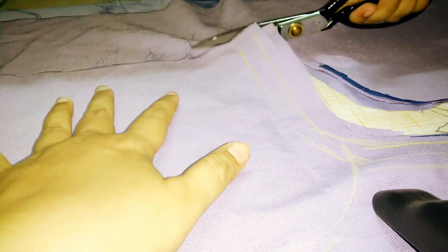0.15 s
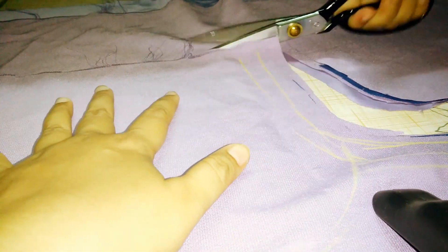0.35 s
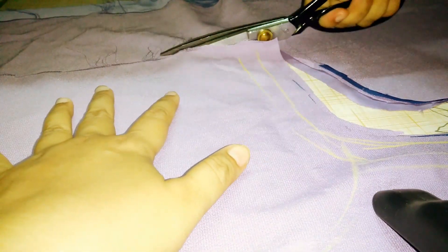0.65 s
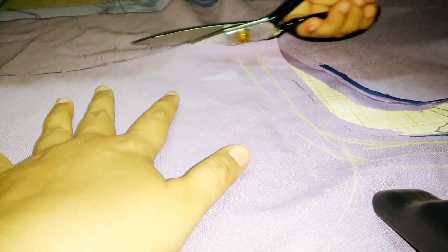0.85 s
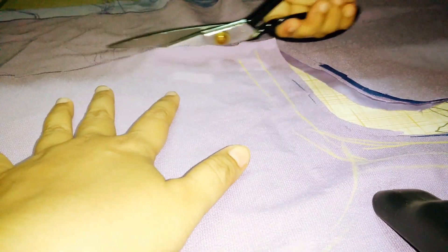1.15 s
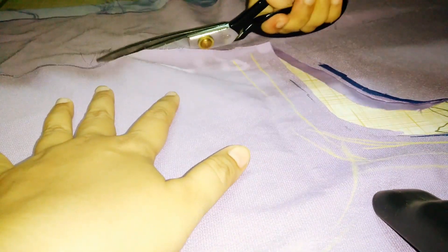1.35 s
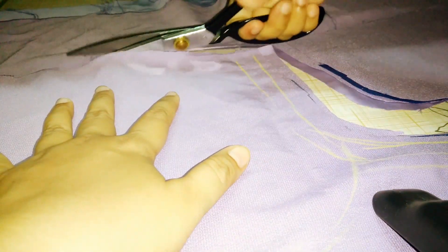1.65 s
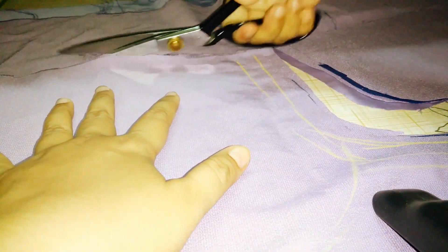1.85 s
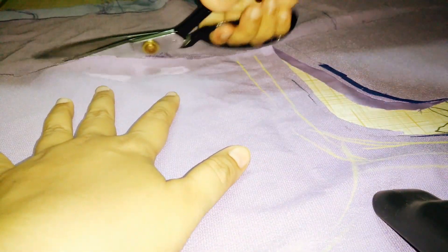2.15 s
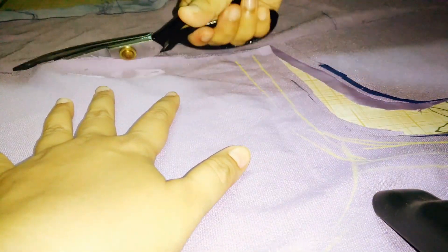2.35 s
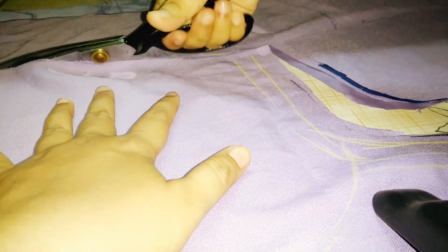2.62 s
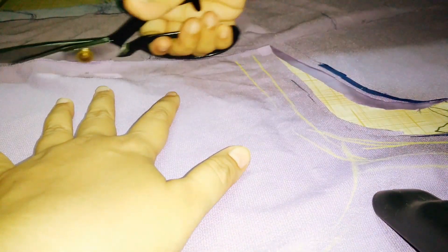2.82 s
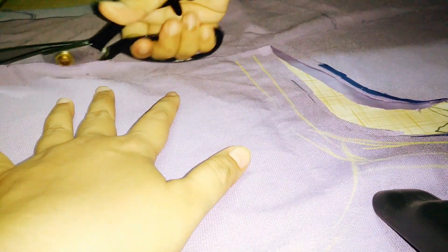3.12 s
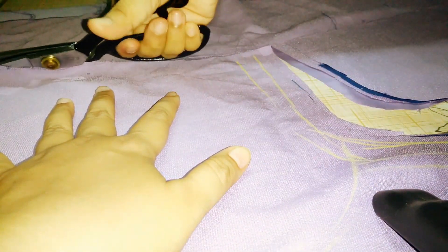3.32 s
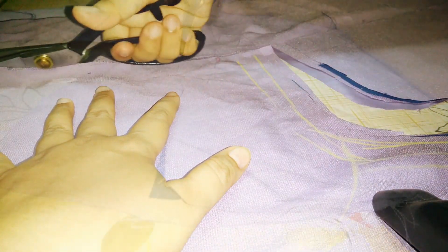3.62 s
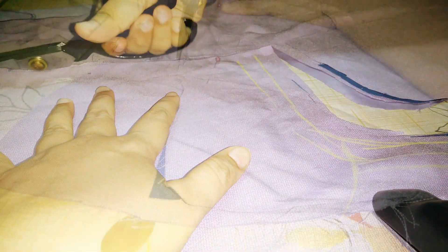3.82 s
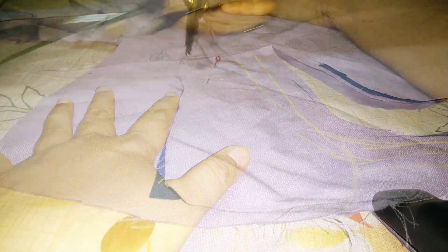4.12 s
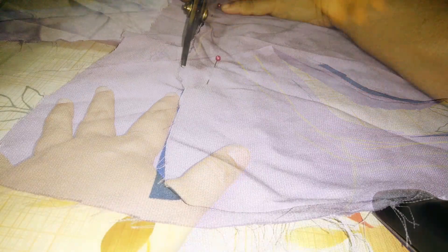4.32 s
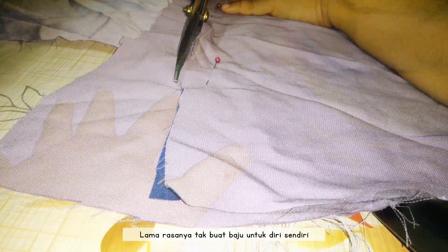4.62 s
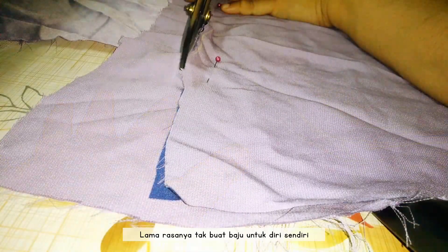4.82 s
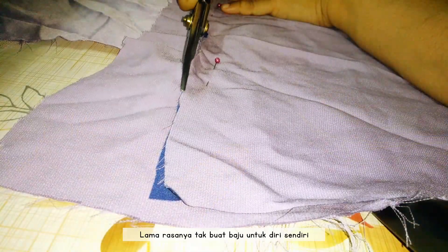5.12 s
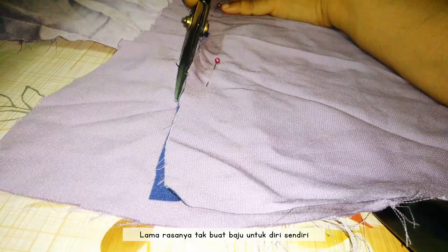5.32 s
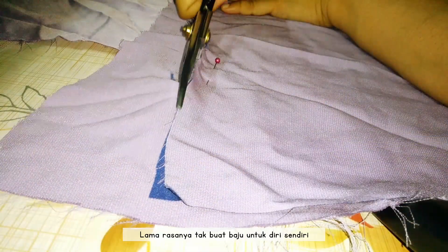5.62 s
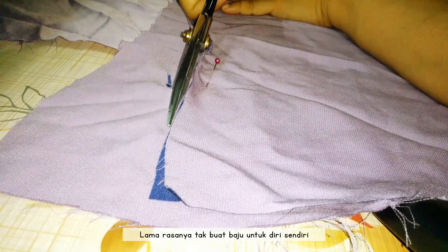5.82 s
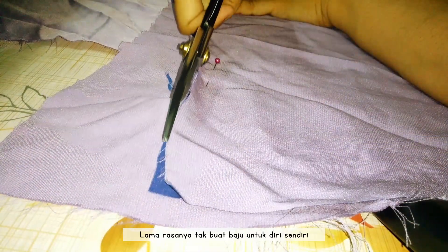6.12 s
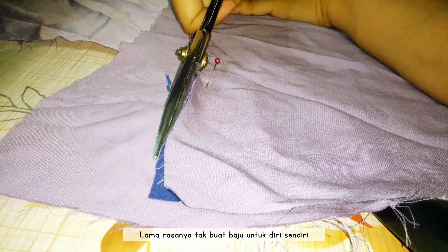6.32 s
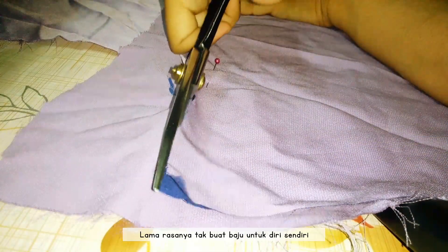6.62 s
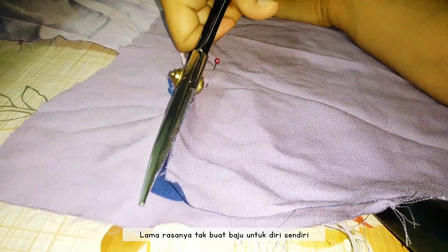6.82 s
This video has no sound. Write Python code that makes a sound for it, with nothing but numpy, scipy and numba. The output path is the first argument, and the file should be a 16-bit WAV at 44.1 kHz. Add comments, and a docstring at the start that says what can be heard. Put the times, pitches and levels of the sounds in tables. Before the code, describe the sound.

Close, dry sound of large steel shears cutting cloth spread on a board in a quiet furnished room. From 0 to 3.6 s quick snips come roughly every 0.35 s, each a tenth of a second of gritty crackle as threads part, with a woody low body and bright steel ring; shorter scrapes of the opening blades fall between them. Light steel taps on the board are scattered throughout, and cloth rustles softly. Around 3.4 to 3.9 s small nudges patter, then a hard, dull knock lands at 4.0 s with another snip. From 4.6 s the cutting slows to strokes at about 4.6, 5.3, 5.9, 6.4 and 6.9 s, mostly longer, pressing harder toward their ends, with distinct opening scrapes between; a firmer knock comes near 6.5 s. Faint room air and hiss remain beneath, the top end dulled by a small microphone.

```python
"""Large steel shears cut cloth spread on a board, close to a small microphone in a quiet room, for 7 s.
From the start quick snips crackle as threads part, and the opening blades scrape; cloth rustles throughout.
Steel knocks on the board are scattered through the work, the hardest at 4 s, after a few small nudges.
From 3.5 to 4.9 s the balance of the resonances shifts; from 4.6 s slow cuts bear down near the tips.
Crackle and grit ring board, handles and blades as resonators; knocks are short pushes, cloth is shaped noise."""
import sys
import numpy as np
from scipy import signal
from scipy.fft import rfft, irfft
from scipy.io import wavfile
from scipy.ndimage import uniform_filter1d
from numba import njit

SR = 44100
rng = np.random.default_rng(int(sys.argv[2]) if len(sys.argv) > 2 else 0)


def digitize_waveform(pressure):
    """Quantize a signal to 16-bit integers and store it at the path in sys.argv[1].

    Rows of a 2-D input are taken as channels; values are limited to [-1, 1].
    """
    field = np.atleast_2d(pressure).T
    bounded = np.clip(field, -1, 1)
    quanta = np.round(bounded * 32767).astype(np.int16)
    wavfile.write(sys.argv[1], SR, quanta)


def nominal_scale(level):
    """Amplitude ratio for a level in decibels (scalar or array-like)."""
    x = np.asarray(level, float) / 20
    return 10 ** x


N = 306495
T = np.arange(N) / SR

# quick snips: start_s, length_s, board_db, blades_re_board_db, attack_s
SNIPS = [(0.326, 0.16, -45, -2.5, 0.011), (0.775, 0.1, -42, -2, 0.024), (1.124, 0.11, -41.5, -2, 0.02),
         (1.486, 0.11, -42, -1.5, 0.019), (1.851, 0.11, -42.5, 1.5, 0.013), (2.175, 0.11, -43, 1, .012),
         (2.478, 0.092, -41, 2, 0.011), (2.762, 0.12, -44.5, 4, 0.012), (3.117, 0.11, -45, 4, 0.017),
         (3.468, 0.17, -46.5, 2, 0.029), (3.953, 0.1, -39, -1.5, 0.024)]
# slow cuts: start_s, length_s, board_db, blades_re_board_db, final_push_db, push_at_share_of_stroke
CUTS = [(4.592, 0.26, -47, 0.5, 4, 0.86), (5.268, 0.25, -45, 0.5, 9.5, 0.83),
        (5.891, 0.16, -47, 1.5, 8, 0.79), (6.369, 0.18, -49.5, 6, 10, 0.83),
        (6.863, 0.21, -48.5, -0.5, 5, .85)]
# blades opening: start_s, length_s, board_db, blades_re_board_db, sag_db
OPENINGS = [(-0.012, 0.059, -43, 1, 6), (0.519, 0.064, -47, 2, 2.5), (0.93, 0.059, -48.5, 0, 0.5),
            (1.279, 0.059, -49, -3.5, 4.5), (1.666, 0.059, -50, -3, 1), (2.014, 0.062, -49, 1, 8.5),
            (2.334, 0.061, -49, 4, 6), (2.631, 0.049, -48.5, 2, 3), (2.929, 0.06, -48.5, 2, 11),
            (3.288, 0.043, -47, 2.5, 8.5), (3.692, 0.071, -49, 3.5, 1.5), (4.156, 0.057, -44.5, 2, -0.5),
            (4.924, 0.046, -45.5, -2.5, 1), (5.595, 0.051, -39.5, -4.5, 7.5), (6.103, 0.07, -46, -2.5, 5),
            (6.612, 0.049, -42, -4.5, 17)]
# nudges of the half-open shears: start_s, length_s, board_db, blades_re_board_db
NUDGES = [(3.442, 0.013, -50, -8), (3.656, 0.02, -50, -1), (3.784, 0.016, -49, 2.5),
          (3.808, 0.024, -49.5, 2), (3.848, 0.023, -51.5, 7), (3.886, 0.01, -51, 0),
          (3.907, 0.0096, -50, 2.5), (3.93, 0.021, -58, 4), (4.063, 0.024, -52.5, 1.5),
          (4.52, 0.045, -62.5, -4), (4.568, 0.011, -50.5, -1), (5.19, 0.024, -46.5, -10.5),
          (5.848, 0.036, -47.5, -11.5), (6.35, 0.015, -48, -7)]
# course of each kind of stroke, added to its levels:
# share_of_stroke, board_db, handles_db, flex_db, edge_db, flex_ring_hz, edge_ring_hz (before COLOUR ratios)
SNIP_COURSE = [(0, -3, -2, -1.5, -2.5, 3800, 6850), (.12, -5, -0.5, 2, 0, 3680, 6750),
               (.4, 0.5, -2, -2, -1, 3570, 6400), (.8, -2.5, 0.5, 0.5, 3, 3220, 6200),
               (1, -5, -1.5, 5, 2.5, 3210, 6300)]
CUT_COURSE = [(0, 0.33, 0.41, 1, -5, 3680, 6420), (.3, -1.1, 0.59, 1.6, -2.5, 3650, 6500),
              (.65, 0, 0, 0, 0.5, 3500, 6500), (1, -1.75, 0, -1, 1.5, 3230, 6280)]
OPENING_COURSE = [(0, 0.17, -4, -7, -9, 3950, 5900), (.35, -3.65, 2.5, 3, 0.5, 4000, 6020),
                  (1, -0.72, -0.5, -0.5, -7.5, 3750, 6640)]
NUDGE_COURSE = [(0, -1.2, 0.43, 2.5, -4.5, 3570, 6500), (1, -2.4, 0, 4.6, -2, 3700, 6560)]
# slow drift of handle and blade levels and ring pitch:
# time_s, handles_re_board_db, flex_re_board_db, flex_pitch_ratio, edge_pitch_ratio
COLOUR = [(0, -9, -9.5, 1.01, 1.1), (0.4, -10, -7.5, 1.17, 0.97), (0.85, -10.5, -8, 1, 1),
          (1.2, -8.5, -11, .99, 0.97), (1.6, -6, -9, 0.95, 0.98), (2.25, -2.5, -10, 1.02, 1.04),
          (2.9, -2.5, -12, 1, 1.01), (3.2, -6.5, -13, .99, 1), (3.6, -4, -11.5, .96, 0.97),
          (4.2, -4, -9, 0.96, 0.99), (4.7, -3.5, -3.5, 1.005, 0.997), (5.401, -6, -6, .97, 1.03),
          (6.0, -4.5, -7.5, 1.02, 0.98), (6.5, -3.5, -7.5, 1.01, 0.93), (6.95, -3.5, -6.5, 1.07, 1.02)]
# blades bite a thicker bunch of threads: time_s, lift_db (each body takes a share)
BITES = [(0.05, 7.5), (0.448, 6.5), (0.876, 3), (1.202, 5.5), (1.306, 10.5), (1.332, 9), (1.6, 10.5),
         (1.941, 6.5), (2.037, 8.5), (2.071, 14), (2.194, 2.5), (2.483, 4.5), (2.856, 7), (2.872, 6),
         (3.217, 2), (3.485, 6.5), (3.598, 9), (3.643, 7), (4.015, 3), (4.047, 6), (4.084, 5), (4.181, 4.5),
         (4.808, 9), (4.834, 10.5), (5.518, 6.5), (6.035, 12), (6.538, 6), (6.632, 5.5), (6.934, -3)]
# weight of the hand thudding through the board: time_s, level_re_board_db
THUD = [(0, -13.5), (1, -11.5), (2, -14.5), (3, -11.5), (4, -13.5), (4.5, -25.5), (6.95, -18.5)]
# resonances of board, its underside, handles, flexing blades, blade edges:
# centre_hz, nominal_width_hz, early_db, late_db
BOARD = [(224.6, 64, -2, -0.5), (310, 141, 0.5, -2), (400, 124, 2, -3), (473, 149, 1, -7),
         (624, 240, -3.5, -6), (814, 135, -1, -4.5), (900, 127, -5.5, -7)]
UNDERSIDE = [(46.6, 28, -6, -5.5), (79, 38, 0, -5), (133.4, 140, -2.5, 1)]
HANDLES = [(1290, 171, 5.5, 0), (1409, 161, 1.5, -0.5), (1620, 490, -11, -12.5), (2315, 370, -16, -22.5)]
FLEX = [(2746, 370, -3.5, -7.5), (3020, 123, -5, -3.5), (3248, 173, -2, -4), (3555, 177, -2.5, -3.5),
        (3800, 290, -3, -6.5), (4400, 790, -3, -11.5), (4845, 470, -3.5, -7)]
EDGE = [(5300, 370, -10, -8), (5800, 440, -2, -8.5), (6137, 260, 0, -1.5), (6426, 440, -6.5, -6),
        (6750, 350, -1, 1), (7110, 310, 2.5, -5.5), (7460, 340, -2.5, -4), (7910, 820, -18, -20)]
# steel knocks on the board: time_s, relative_level_db, tick_re_knock_db (both before fixed gains), struck_spot_hz
KNOCKS = [(0.35, -23.5, -5.5, 245), (0.81, -30.5, -9, 440), (1.148, -27, -7, 430), (1.292, -31.5, -17, 510),
          (1.467, -43.5, -2, 274), (1.512, -25.5, -19, 1260), (1.679, -37.5, -4, 350),
          (1.861, -32, -15, 340), (1.886, -21.5, -13, 1220), (2.025, -30, -21, 1260),
          (2.347, -28, -22, 1320), (2.388, -25.5, -26, 1310), (2.482, -33.5, -12, 393),
          (2.641, -39.5, -1, 401), (2.77, -36.5, -11, 408), (3.45, -35.5, -10, 410), (3.601, -28, -16, 527),
          (3.701, -35, -18, 210), (4.008, -8, -23, 980), (4.039, -18, -27, 500), (4.163, -33, -21, 275),
          (4.93, -33.5, -15, 390), (5.2, -29.5, -26, 400), (5.279, -24, -14, 820), (5.486, -25, -16, 474),
          (5.601, -28.5, -22, 454), (5.855, -31, -50, 310), (5.9, -36, -19, 447), (6.03, -20, -12, 560),
          (6.111, -38.5, -21, 223), (6.146, -30, -21, 400), (6.358, -28.5, -24, 318),
          (6.377, -33.5, -22, 598.4), (6.54, -16, -32, 715), (6.618, -37.5, -14, 293)]
# spectrum of air and cloth: freq_hz, relative_level_db
AIR = [(15, -69), (25, -32.5), (53, -16.5), (91, -4), (125, -16), (172, -12), (237, -5), (261, -8.5),
       (493, -12.5), (2410, -34.5), (4230, -30.5), (4560, -31), (7250, -32), (8600, -51.5), (11200, -79.5),
       (18900, -120)]
# ranges favoured by sliding cloth: centre_hz, half_width_hz (to 1/e of the lift), lift_db
WEAVE = [(2210, 290, 4.5), (4860, 450, 1), (7300, 560, 4)]
# cloth sliding on the board: middle_s, half_length_s (to 1/e of the lift), low_lift_db, mid_lift_db, high_lift_db
SLIDES = [(0.22, 0.25, 2, -5, 3.5), (0.677, 0.24, 3.5, 5, 4.5), (0.776, 0.013, 9, 3, 3),
          (1.04, 0.14, 2.5, 1, 2.5), (1.121, 0.01, 12, -1, 2), (1.49, .02, 2, 16, 10),
          (1.8, 0.055, 4, -2, 2), (2.62, 0.059, -3, -3, -1), (3.403, 0.17, 0.5, 4.5, 1.5),
          (4.346, 0.25, 3.5, 0, 3), (4.552, 0.021, 5.5, 9, -2), (4.9, 0.039, -1, 2, 7),
          (5.797, 0.1, -2, 6.5, 2), (6.197, 0.097, -4, 4, -0.5), (6.334, 0.085, -1, 12, 7)]

ATTACK_S, ONSET_DB, PUSH_WIDTH_SHARE = 0.0093, -17.5, 0.093
RELEASE_S = {"snip": .025, "cut": 0.021, "opening": 0.021, "nudge": 0.019}
RELEASE_DB, BLADE_DAMP_DB = -27.5, -3  # per RELEASE_S; blades fall by the second on top
HANDLE_SHARE = 0.28  # handles follow the blade level in part
UPPER_DB, UPPER_SHARE = -3.5, 0.65  # upper board modes follow the handles in part
BITE_S = .003  # Gaussian sigma
BALANCE_SHIFT_S = (3.5, 4.9)
KNOCK_RISE_S, KNOCK_DELAY_S = .0006, .002
SPLIT_HZ, RANGES_DB, FLICKER_DB = (1200, 2900), (-67.5, -79, -74), 1.0  # ranges: low, middle, high
HISS_DB, DOUBLE_HISS_S = -84.5, (3.47, 4.95)


def shears():
    """One crackle drives every body; each resonance also catches its own grit and swells on its own."""
    board_db, handles_db, flex_db, edge_db, flex_hz, edge_hz = strokes()
    crackle = snaps(4000, 3.2, 3.73)
    slip_db = 1.45 * walk(80)  # grip slips and holds for all bodies at once
    bite_db = bites()
    thud_db = np.interp(T, *np.transpose(THUD))
    upper_db = UPPER_DB + UPPER_SHARE * handles_db
    # modes, level re board dB, grit re crackle (ratio), patchiness dB, bite share, ring Hz
    bodies = [
        (BOARD[:5], -0.8, 1.2, 2.5, .6, None),
        (BOARD[5:], upper_db, 1.2, 2.5, .6, None),
        (HANDLES, handles_db, 1.2, 2.5, .6, None),
        (UNDERSIDE, thud_db, 1.2, 3.0, .6, None),
        (FLEX, flex_db, 1.5, 2.5, .9, flex_hz),
        (EDGE, edge_db, 1.5, 2.5, .9, edge_hz),
    ]
    out = 0
    for modes, rel_db, grit_ratio, patchy_db, bite_share, ring_hz in bodies:
        gain = nominal_scale(board_db + rel_db + slip_db + bite_share * bite_db)
        gain = gain / np.sqrt(1 + grit_ratio ** 2) / modes_rms(modes)
        drives = []
        for _ in modes:
            grit = rng.laplace(size=N) / np.sqrt(2)
            drive = gain * (crackle + grit_ratio * grit) * nominal_scale(patchy_db * walk(45))
            if ring_hz is not None:
                # free blade length changes through the stroke; lifts modes near its own pitch
                drive = 0.47 * drive + 0.88 * svf(drive, np.clip(ring_hz, 2000., 9000.), 470.0)
            drives.append(drive)
        out = out + ring(drives, modes)
    return out


def strokes():
    """Each stroke sets in, runs the course of its kind and lets go; the loudest stroke holds the controls."""
    # start, length, board and blades levels, attack, (push level, place), sag, course, kind
    plan = [(*r[:4], r[4], (0, 0), 0, SNIP_COURSE, "snip") for r in SNIPS]
    plan += [(*r[:4], ATTACK_S, r[4:], 0, CUT_COURSE, "cut") for r in CUTS]
    plan += [(*r[:4], ATTACK_S, (0, 0), r[4], OPENING_COURSE, "opening") for r in OPENINGS]
    plan += [(*r, ATTACK_S / 2, (0, 0), 0, NUDGE_COURSE, "nudge") for r in NUDGES]
    # rows: board, handles, flex, edge dB; flex, edge ring Hz
    controls = np.array([-120., 0, 0, 0, 3600, 6500])[:, None].repeat(N, axis=1)
    for start_s, length_s, db, blades_db, attack_s, (push_db, push_at), sag_db, course, kind in plan:
        first = max(int((start_s - .004) * SR), 0)
        span = slice(first, int((start_s + length_s + 2 * RELEASE_S[kind]) * SR))
        t = T[span] - start_s
        share = np.clip((t - attack_s) / max(length_s - attack_s, .001), 0, 1)
        at, *columns = np.transpose(course)
        new = np.array([np.interp(share, at, c) for c in columns])
        push = np.exp(-((share - push_at) / PUSH_WIDTH_SHARE) ** 2)
        new[0] += db - sag_db * share + push_db * push
        new[0] += np.interp(t, (-.004, 0, attack_s), (3 * ONSET_DB, ONSET_DB, 0))
        releases = np.maximum(t - length_s, 0) / RELEASE_S[kind]
        new[0] += RELEASE_DB * releases
        new[1] += HANDLE_SHARE * blades_db
        new[2:4] += blades_db + BLADE_DAMP_DB * releases
        controls[:, span] = np.where(new[0] > controls[0, span], new, controls[:, span])
    time_s, *colour = np.transpose(COLOUR)
    colour = [np.interp(T, time_s, c) for c in colour]
    controls[1:3] += colour[:2]
    controls[4:] *= colour[2:]
    return controls


def snaps(rate_hz, spread_db, bunch_db):
    """Threads parting: random clicks of very uneven size, in bunches as the blades stick and slip."""
    chance, size, sign = rng.random((3, N))
    size_db = np.minimum(-spread_db * np.log(size + 1e-9), 30)
    clicks = (chance < rate_hz / SR) * nominal_scale(size_db) * np.sign(sign - .5)
    return unit(clicks * nominal_scale(bunch_db * walk(110)))


def bites():
    """Short Gaussian swells of the cutting force, in dB."""
    time_s, lift_db = np.transpose(BITES)[:, :, None]
    swells = lift_db * np.exp(-.5 * ((T[::32] - time_s) / BITE_S) ** 2)
    return swells.sum(axis=0).repeat(32)[:N]


def knocks():
    """A short push rings board and handles, most near the struck spot's pitch; a sharp tick rings the blades."""
    push, tick = np.zeros(N), np.zeros(N)
    t = np.arange(600) / SR
    for time_s, level_db, tick_db, hz in KNOCKS:
        at = int((time_s + KNOCK_DELAY_S) * SR)  # each knock sounds 2 ms after its listed time
        rise = 1 - np.exp(-(t / KNOCK_RISE_S) ** 2)
        decay = np.exp(-t * hz / 0.85)
        push[at:at + len(t)] += nominal_scale(level_db + 5.5) * np.sin(2 * np.pi * hz * t) * decay * rise
        tick[at + int(KNOCK_RISE_S * SR)] += nominal_scale(level_db + tick_db + 20)
    wood, steel = BOARD + HANDLES, FLEX + EDGE
    return ring([push] * len(wood), wood) + 0.3 * push + ring([tick] * len(steel), steel)


def ring(drives, modes):
    """Sum of steep resonances (two equal peaks in series), each on its own drive; early balance fades to late."""
    out, late = 0, np.interp(T, BALANCE_SHIFT_S, (0, 1))
    for drive, (hz, width_hz, early_db, late_db) in zip(drives, modes):
        b, a = signal.iirpeak(hz, hz / width_hz / 0.97, fs=SR)
        rung = signal.lfilter(b, a, signal.lfilter(b, a, drive))
        out = out + nominal_scale(early_db + (late_db - early_db) * late) * rung
    return out


def modes_rms(modes):
    """Approximate rms of the resonances under unit noise, at early levels."""
    return np.sqrt(sum(nominal_scale(db) ** 2 * width_hz for _, width_hz, db, _ in modes) / SR)


@njit
def svf(x, hz, width_hz):
    """State-variable band-pass whose centre may move, gain 1 at the centre."""
    y, band, low = np.empty(len(x)), 0., 0.
    for i in range(len(x)):
        g, k = np.tan(np.pi * hz[i] / SR), width_hz / hz[i]
        v = (band + g * (x[i] - low)) / (1 + g * (g + k))
        band, low, y[i] = 2 * v - band, low + 2 * g * v, k * v
    return y


def walk(rate_hz):
    """Random levels held 1 / rate and slewed twice; rms 1."""
    k = int(SR / rate_hz)
    held = np.repeat(rng.standard_normal(N // k + 1), k)
    return unit(uniform_filter1d(uniform_filter1d(held, k), k)[:N])


def unit(x):
    """Scale to rms 1."""
    return x / np.sqrt(np.mean(x ** 2))


def room(x, t60_s, wet_db):
    """Short soft-furnished tail: decaying noise after 3 ms."""
    t = np.arange(SR // 4) / SR
    tail = rng.standard_normal(len(t)) * np.exp(-np.log(1000) * t / t60_s) * (t > .003)
    return x + nominal_scale(wet_db) * signal.fftconvolve(x, tail / np.linalg.norm(tail))[:N]


def rustle():
    """Room air and shifting cloth: coloured noise whose three ranges swell as the cloth slides, and flicker."""
    hz = np.fft.rfftfreq(N, 1 / SR) + 1
    freq_hz, air_db = np.transpose(AIR)
    spec = rfft(rng.standard_normal(N)) * nominal_scale(np.interp(np.log(hz), np.log(freq_hz), air_db))
    weave_db = sum(lift_db * np.exp(-((hz - mid_hz) / width_hz) ** 2) for mid_hz, width_hz, lift_db in WEAVE)
    spec = spec * nominal_scale(weave_db)
    middle_s, half_s, *lifts_db = np.transpose(SLIDES)[:, :, None]
    bump = np.exp(-((T[::32] - middle_s) / half_s) ** 2)
    low, below_high = (1 / (1 + (hz / edge_hz) ** 6) for edge_hz in SPLIT_HZ)
    out = 0
    for share, base_db, lift_db in zip((low, below_high - low, 1 - below_high), RANGES_DB, lifts_db):
        level_db = base_db + (lift_db * bump).sum(axis=0).repeat(32)[:N]
        out = out + unit(irfft(spec * share, N)) * nominal_scale(level_db + FLICKER_DB * walk(13))
    return out


def scene():
    """Shears and knocks in the room over the rustle."""
    return (room(shears() + knocks(), 0.11, -22.5) + rustle())[None]


def top_cut(x):
    """Nothing passes above the cut-off."""
    return signal.sosfilt(signal.butter(12, 15740, fs=SR, output="sos"), x)


def record(dry):
    """Microphone path ends steeply at 8.6 kHz; faint even hiss over all, of double power for a while."""
    low_pass = signal.ellip(8, .5, 70, 8600, fs=SR, output="sos")
    mix = signal.sosfilt(low_pass, dry)
    hiss_power = 1 + (T > DOUBLE_HISS_S[0]) * (T < DOUBLE_HISS_S[1])
    mix = mix + nominal_scale(HISS_DB) * np.sqrt(hiss_power) * rng.standard_normal(N)
    return top_cut(mix)


dry = scene()
out = record(dry)
digitize_waveform(out)
```